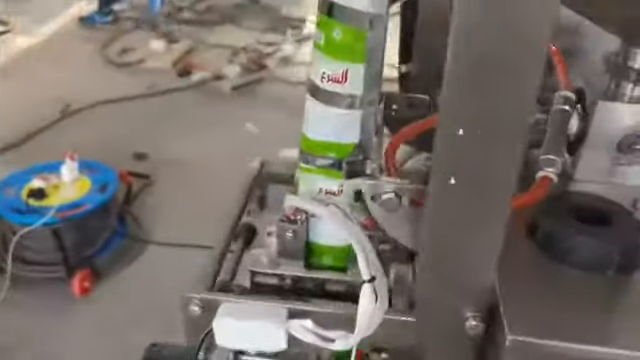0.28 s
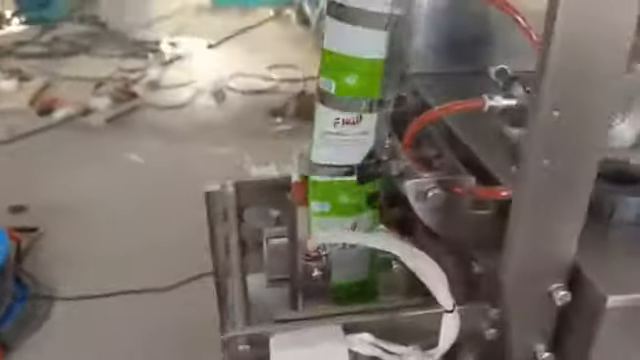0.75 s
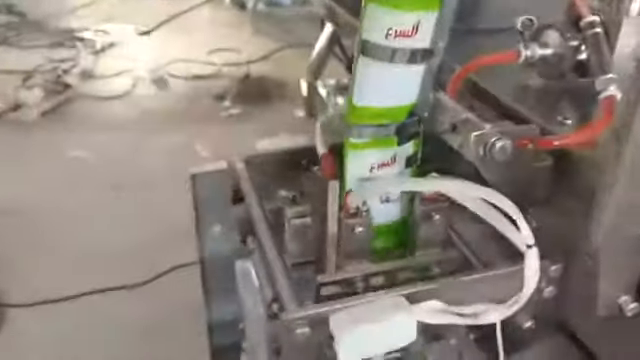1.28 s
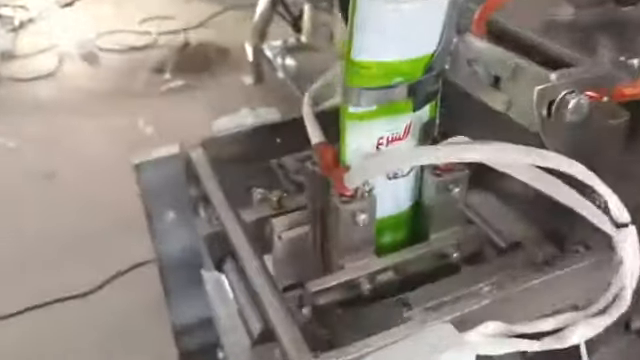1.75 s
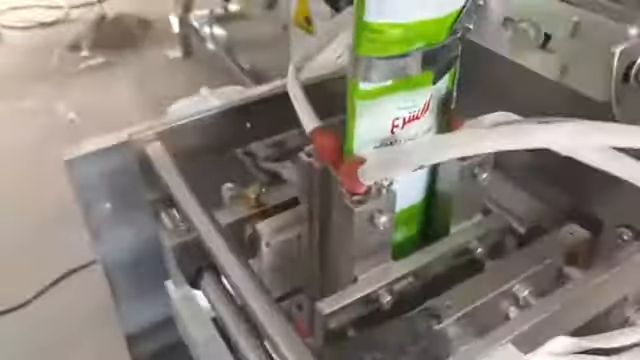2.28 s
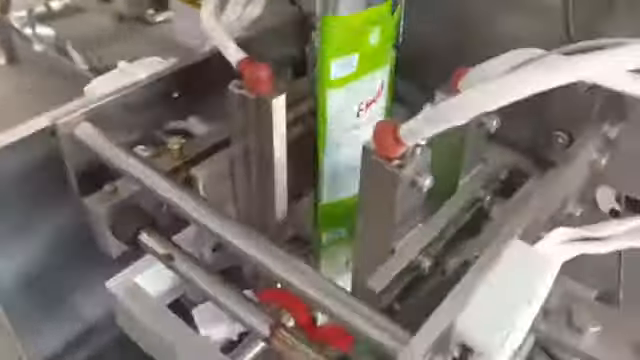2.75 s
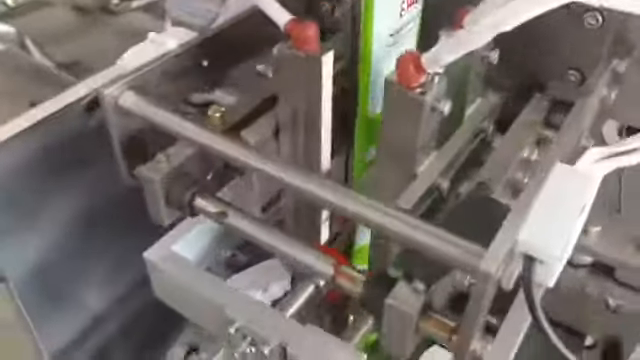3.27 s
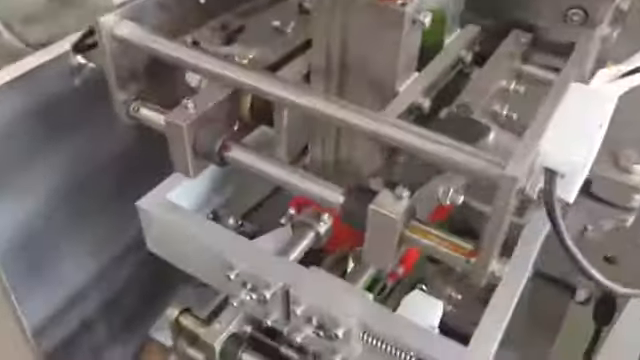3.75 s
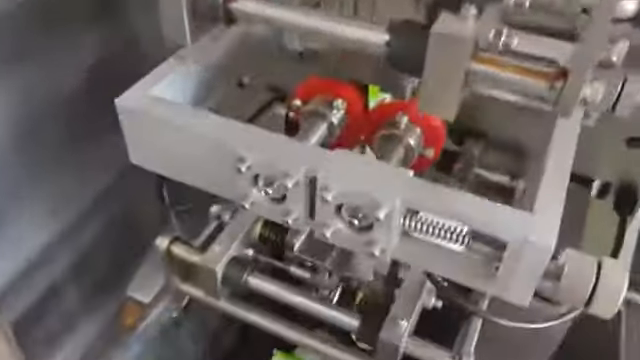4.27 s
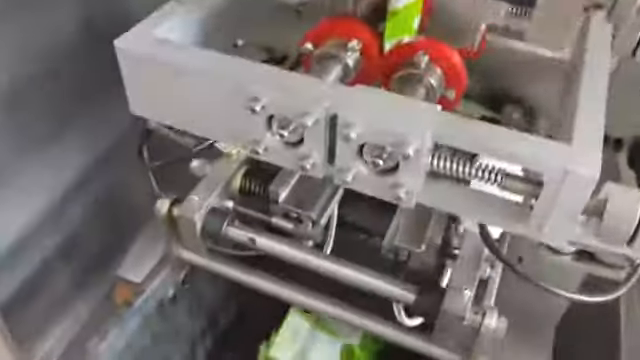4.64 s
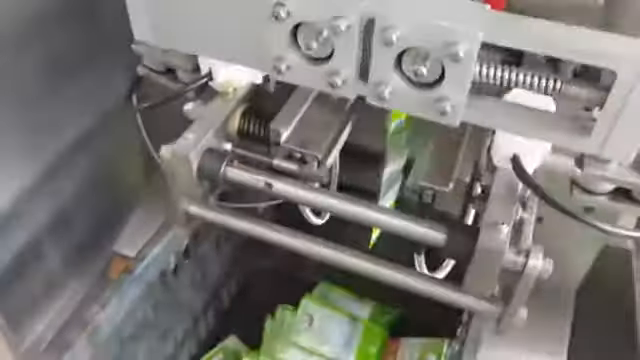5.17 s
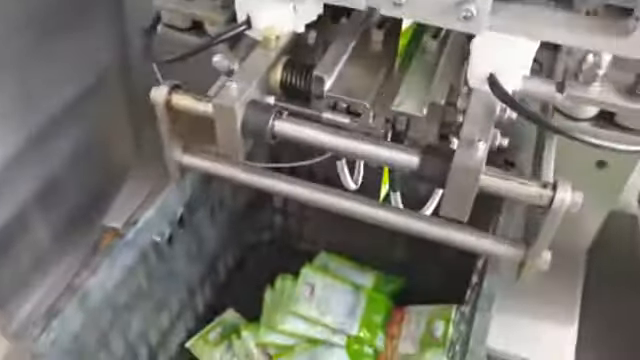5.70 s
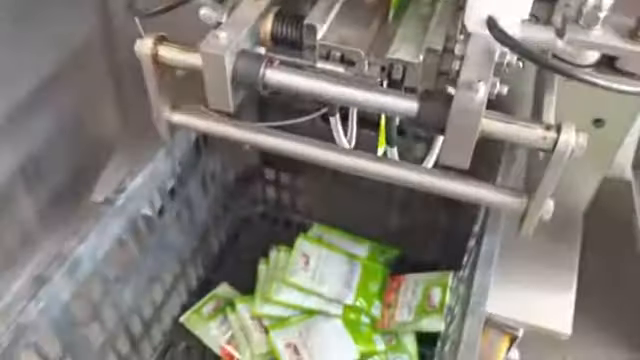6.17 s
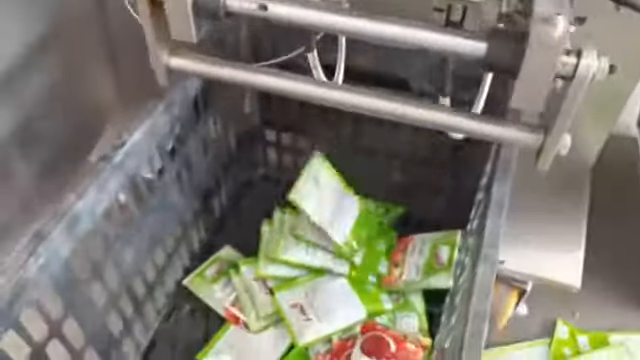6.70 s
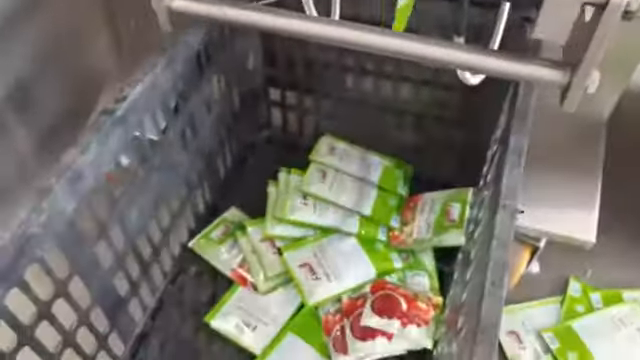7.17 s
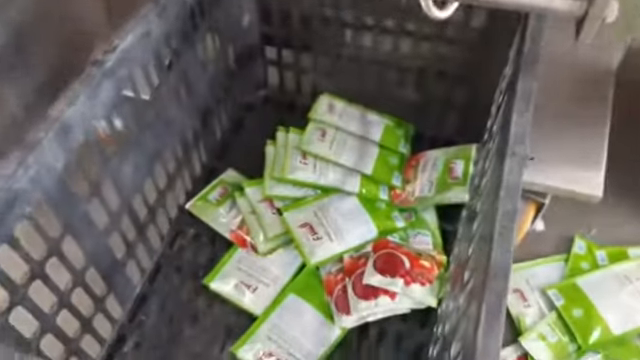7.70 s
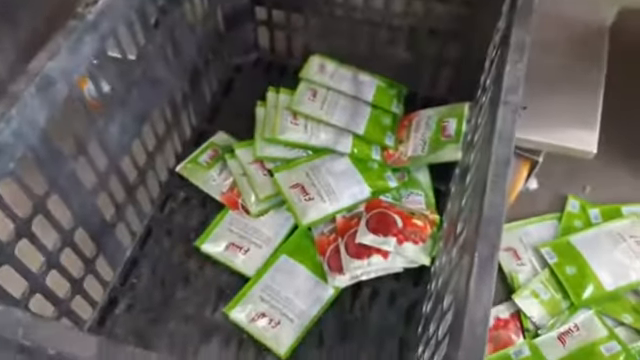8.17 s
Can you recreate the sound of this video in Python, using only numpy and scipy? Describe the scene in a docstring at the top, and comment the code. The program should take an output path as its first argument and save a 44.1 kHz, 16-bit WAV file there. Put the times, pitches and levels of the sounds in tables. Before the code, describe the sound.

Inside a busy factory hall, a packing machine gives off a constant, piercing air hiss over a wavering low hum and soft roar. Short scrapes recur at two-second intervals, with scattered dry clicks and knocks. Near the end the hiss weakens and dulls, bright foil snaps burst out as a packet lands, then thin metal rattles and rumble swells. Heard close on a moving hand-held stereo microphone, left-heavy, with the right side intermittently covered.

```python
"""A steady, sputtering high hiss comes first: compressed air escaping from a sachet packing machine.
Behind it lie the hum of the drive and the roar of a factory hall, all made from shaped noise and wavering tones.
Every two seconds the jaws scrape (gliding noise); the mechanism knocks and a loose panel chatters (struck modes).
Late on, a cut sachet crackles onto the pile in a crate (short bursts of bright noise).
A hand-held stereo microphone moves down along the machine, and the hand at times muffles its right port."""
import sys
import numpy as np
from scipy import signal
from scipy.fft import rfft, irfft, next_fast_len
from scipy.io import wavfile
from scipy.ndimage import uniform_filter1d, map_coordinates

SR = 44100
rng = np.random.default_rng(int(sys.argv[2]) if len(sys.argv) > 2 else 0)


def store_pcm(level_fs):
    """Save levels as 16-bit WAV."""
    pcm = np.round(np.clip(level_fs, -1, 1) * 32767).astype(np.int16)
    wavfile.write(sys.argv[1], SR, np.atleast_2d(pcm).T)


N = 371757
TIME = np.arange(N) / SR  # seconds


def gain_of(db):
    """Turns decibels into a factor for the amplitude."""
    return 10 ** (np.asarray(db) / 20)


def evened(x):
    """Scales a signal to an rms of 1."""
    return x / np.sqrt(np.mean(x ** 2) + 1e-20)


def curve_over_time(rows):
    """Joins rows of (seconds, value) by straight lines."""
    return np.interp(TIME, *np.transpose(rows))


def level(rows):
    """Turns rows of (seconds, dB) into a gain over time."""
    return gain_of(curve_over_time(rows))


def read(points, hz):
    """Reads rows of (Hz, value) on a log-frequency axis."""
    point_hz, value = np.transpose(points)
    return np.interp(np.log(hz + 1), np.log(point_hz + 1), value)


def coloured(x, colour):
    """Shapes the spectrum of x by rows of (Hz, dB), then sets its rms to 1."""
    size = next_fast_len(len(x))
    hz = np.fft.rfftfreq(size, 1 / SR)
    shaped = rfft(x, size) * gain_of(read(colour, hz))
    return evened(irfft(shaped, size)[:len(x)])


def drift(rate):
    """Random wandering of rms 1 that heads for a new value rate times a second."""
    values = rng.standard_normal(N // 8)
    return evened(map_coordinates(values, [TIME * rate], order=1, mode="wrap"))


def add(mix, s, sound):
    """Mixes a sound in, starting at s seconds."""
    part = mix[..., max(round(s * SR), 0):][..., :sound.shape[-1]]
    part += sound[..., :part.shape[-1]]


def ports(likeness):
    """White noise at two ports that are partly alike, by rows of (Hz, likeness 0 to 1)."""
    size = next_fast_len(N)
    first, other = rfft(rng.standard_normal((2, size)))
    same = np.clip(read(likeness, np.fft.rfftfreq(size, 1 / SR)), 0, 1)
    second = same * first + np.sqrt(1 - same ** 2) * other
    return irfft(np.array([first, second]), size)[:, :N]


def resonance(hz, width):
    """Noise of rms 1 in a resonance about width Hz wide, whose pitch follows the curve hz."""
    r = np.exp(-np.pi * abs(width) * np.sqrt(2) / SR)
    noise = rng.standard_normal(len(hz)) + 1j * rng.standard_normal(len(hz))
    smoothed = signal.lfilter([1 - r], [1, -r], noise)
    slow = signal.lfilter([1 - r], [1, -r], smoothed)
    # turning the slow noise round lifts it from 0 Hz to the wanted pitch
    return evened((slow * np.exp(2j * np.pi * np.cumsum(hz) / SR)).real)


def tones(rows):
    """Steady narrow resonances that waver in strength, from rows of (Hz, dB, width in Hz)."""
    return sum(gain_of(db) * resonance(np.full(N, hz), width) for hz, db, width in rows)


def wavering(hz, waver_hz, throb_db):
    """A tone of rms 1 that wanders a little in pitch and strength."""
    turns = np.cumsum(hz + waver_hz * drift(16)) / SR
    return evened(np.sin(2 * np.pi * turns) * gain_of(throb_db * drift(9)))


def mode(t, hz, t60):
    """One struck mode: a sine that fades by 60 dB in t60 seconds."""
    return np.sin(2 * np.pi * hz * t) * np.exp(-np.log(1000) * t / t60)


def burst(colour, t60, rise):
    """Coloured noise at two ports that rises fast and dies away, like a blow into many close modes."""
    t = np.arange(SR // 4) / SR
    noise = np.array([coloured(z, colour) for z in rng.standard_normal((2, len(t)))])
    return noise * (1 - np.exp(-t / rise)) * np.exp(-np.log(1000) * t / t60)


# The hand slips over the right port. Each row: start in seconds, end in seconds, basic loss in dB;
# each layer loses its own multiple of it.
COVERS = [(-.2, .58, 10), (0.916, 1.163, 3), (1.363, 2.65, 9), (2.902, 3.03, 7), (3.46, 3.75, 3.5)]
COVER_S, UNCOVER_S = 0.13, 0.09  # seconds the hand takes to close and to open


def covered():
    """Basic level change in dB at the right port as the hand closes over it and lets go."""
    loss = 0
    for start, end, db in COVERS:
        closing = (TIME - start) / COVER_S
        opening = (end - TIME) / UNCOVER_S
        loss = loss + db * np.clip(np.minimum(closing, opening) + .5, 0, 1)
    return -loss


def shaded(pair, share=0.94, open_db=0.33):
    """The hand weakens a layer at the right port; lower sounds are given a smaller share of the dB."""
    return pair * np.array([np.ones(N), gain_of(share * (open_db + covered()))])


# How the loss off axis spreads over pitch. Each row: frequency in Hz, share of the loss (below 0: opposite).
OFF_AXIS_SHARE = [(3000, 0.47), (5600, -0.47), (7000, -0.46), (8700, -0.27), (10300, 0.5), (15000, 1)]


def uneven(pair, ripple_db, patch_db, loss_db):
    """Random fine ripples and broad patches make a hiss uneven over time and pitch; off axis the top fades."""
    hz, t, z = signal.stft(pair, SR, nperseg=1024, noverlap=768)
    ripples, patches = rng.standard_normal((2,) + z.shape)
    # fine ripples: smooth over time, narrow in pitch, separate at each port
    ripples = uniform_filter1d(uniform_filter1d(ripples, size=9, axis=2), size=3, axis=2)
    ripples = gain_of(ripple_db * evened(uniform_filter1d(ripples, size=2, axis=1)))
    ripples /= np.sqrt(uniform_filter1d(ripples ** 2, size=24, axis=1))  # evened out across pitch
    # broad patches: shared by both ports
    patches = uniform_filter1d(uniform_filter1d(patches[0], size=12, axis=1), size=9, axis=0)
    patches = evened(gain_of(patch_db * evened(patches)))
    loss = read(OFF_AXIS_SHARE, hz)[:, None] * np.interp(t, TIME, loss_db)
    heard = z * ripples * patches * gain_of(-loss)
    return signal.istft(heard, SR, nperseg=1024, noverlap=768)[1][:, :N]


# How alike the hall sounds at both ports. Each row: frequency in Hz, likeness from 0 to 1.
LIKENESS = [(30, .75), (80, 0.98), (170, 0.86), (350, 0.78), (700, 0.25), (1300, 0), (4000, 0.25)]


def diffuse(colour):
    """Noise from all round: most alike at both ports in the bass, far less in the treble."""
    return np.array([coloured(z, colour) for z in ports(LIKENESS)])


# Levels of the hall's rumble (growing near the floor), roar and diffuse hiss.
# Each row: time in seconds, relative level in dB.
RUMBLE = [(0, -44), (.9, -45), (1.28, -48), (1.65, -43), (2.2, -46.5), (2.4, -47), (2.7, -46), (3.1, -49.5),
          (3.5, -45), (4.1, -46.5), (4.8, -46.7), (5.6, -44.5), (6.7, -45.5), (7.55, -42), (7.95, -38.5),
          (8.3, -42.5), (8.43, -47)]
ROAR = [(0, -48.5), (.24, -45.5), (.6, -50.5), (1.15, -51.5), (1.5, -49), (2.22, -49), (2.32, -53),
        (2.75, -51.5), (2.93, -54), (3.3, -50.5), (3.7, -51.5), (4.27, -49), (4.5, -52), (5.3, -49.5),
        (6.25, -48), (6.8, -47), (7.2, -49.7), (7.55, -46), (8.43, -41)]
WASH = [(0, -44.5), (1.2, -41.5), (2.2, -44), (2.35, -44.5), (2.8, -42), (3.65, -47), (4.15, -45.5),
        (4.6, -44), (6.3, -42), (7.05, -42.5), (7.35, -44.5), (8.43, -44.5)]
# Their colours. Each row: frequency in Hz, relative strength in dB.
RUMBLE_COLOUR = [(20, -35), (50, -23), (64, -19), (76, -3.5), (100, .5), (130, -1), (160, -1.5),
                 (200, -1.5), (260, -6), (400, -22.5), (900, -60)]
ROAR_COLOUR = [(100, -30), (200, -9.5), (260, 1.2), (330, -1.3), (450, -2), (600, -5.5), (700, -5.5),
               (820, -8), (1000, -9.5), (1250, -18), (1800, -24.5), (5000, -48)]
WASH_COLOUR = [(300, -15), (900, -7), (1500, -4), (2100, 1), (2700, -0.5), (4000, -2.2), (6000, -1.5),
               (10000, -32), (15500, -37)]


def hall(rumble_db=-1.6, roar_db=0.0, flutter_db=1.63, surge_db=1.46, sway_db=0.15,
         ripple_db=4.5, patch_db=1.5, wash_db=-1.28, lump_db=1.5):
    """Rumble, surging roar and diffuse hiss of the machinery; the hiss flutters randomly in level."""
    lumps = evened(gain_of(lump_db * drift(18)))
    rumble = diffuse(RUMBLE_COLOUR) * level(RUMBLE) * gain_of(rumble_db) * lumps
    roar = diffuse(ROAR_COLOUR) * level(ROAR) * gain_of(roar_db + surge_db * drift(14))
    flutter = evened(gain_of(flutter_db * drift(60) + sway_db * drift(16)))
    wash = diffuse(WASH_COLOUR) * level(WASH) * gain_of(wash_db) * flutter
    wash = uneven(wash, ripple_db, patch_db, np.zeros(N))
    return rumble + shaded(roar, share=.3) + shaded(wash)


# Colour of the hiss's grain. Each row: frequency in Hz, relative strength in dB.
GRAIN_COLOUR = [(300, -21), (1300, -5), (2300, 1), (5500, -2), (10000, -16), (15500, -35)]


def grain(rate=260, spread_db=3.5, grain_db=-8.5):
    """Tiny random ticks, about rate a second, give the hiss a grainy texture."""
    sizes = gain_of(spread_db * np.minimum(rng.exponential(1, N), 3))
    ticks = sizes * (rng.random(N) < rate / SR) * rng.choice([-1., 1.], N)
    tick_sound = burst(GRAIN_COLOUR, t60=0.0074, rise=.0001)
    pair = signal.oaconvolve(ticks[None], tick_sound, axes=1)[:, :N]
    return shaded(evened(pair) * level(WASH) * gain_of(grain_db))  # swells with the hiss


# Hum of the drive, then thin whines of the electrics.
# Each row: frequency in Hz, relative level in dB, approximate width in Hz.
HUM = [(138.9, -55.5, 5), (690, -65.5, 35), (985, -75, 23)]
WHINES = [(2085, -68, 22), (11900, -68, 20), (14430, -74, 10), (14950, -75, 10)]
# The gear's tone as the microphone comes down to it. Each row: time in seconds, relative level in dB.
GEAR = [(0, -7), (3.4, -7), (4.0, -2), (5.5, -4.5), (6.7, 0.5), (8.43, -2)]


def drive(motor_hz=183.8, motor_db=-52.0, waver_hz=1.7, throb_db=2.5, follow=0.52,
          gear_hz=375.3, gear_db=-60, gear_waver_hz=1.4):
    """Motor tone and hum swell with the rumble; a gear sings low in the machine; the hand can hide the whines."""
    motor = gain_of(motor_db) * wavering(motor_hz, waver_hz, throb_db)
    swell = evened(level(RUMBLE) ** follow)
    gear = gain_of(gear_db) * wavering(gear_hz, gear_waver_hz, throb_db) * level(GEAR)
    whines = np.array([tones(WHINES), tones(WHINES)])
    return (motor + tones(HUM)) * swell + gear + shaded(whines)


# Low throbs, mostly of the motor, and a finger bump at the right port (0.51 s).
# Each row: time of the peak in seconds, level in dB, pitch in Hz, length in seconds, left minus right in dB.
THROBS = [(.16, -40.5, 186.4, .14, 0), (.51, -38, 138.3, 0.091, -18), (1.04, -44.5, 170, .09, 0),
          (1.18, -41.5, 185, 0.11, 0), (1.63, -41.5, 180, .14, 2), (1.91, -41, 208, 0.074, 4),
          (2.06, -48, 258.4, .2, 0), (2.59, -44, 185.5, .09, 0), (3.699, -41.5, 183.7, 0.2, 2),
          (5.41, -45, 180, .1, 0), (7.07, -41, 195.5, .12, -2), (7.46, -40.5, 185.4, .12, -2),
          (7.655, -42, 186, .08, 0), (7.9, -43.5, 261.5, .1, 0), (7.96, -35, 109, 0.11, -1),
          (8.265, -38, 172, .07, 0)]


def throbs():
    """Low throbs, mostly of the motor, and a finger bump at the right port; each swells and dies."""
    out = np.zeros((2, N))
    for s, db, hz, length, pan_db in THROBS:
        t = np.arange(int(length * SR)) / SR
        sides = gain_of([[db + pan_db / 2], [db - pan_db / 2]])
        throb = np.sqrt(2) * np.hanning(len(t)) * np.sin(2 * np.pi * hz * t)
        add(out, s - length / 2, sides * throb)
    return out


# Knocks and clicks of the mechanism. Each row: start in seconds, relative level in dB, pitch in Hz,
# seconds to fade by 60 dB.
KNOCKS = [(.858, -32.5, 2700, .06), (2.683, -45, 1210, .16), (2.705, -46, 720, .12),
          (3.782, -39, 2540, .06), (4.342, -44, 1300, .08), (4.707, -37, 1600, .06),
          (5.518, -38, 1040, .06), (6.371, -38.5, 1250, 0.062), (6.592, -33, 3400, .07),
          (6.606, -39, 2100, 0.071), (6.735, -37, 3750, .04), (6.883, -38, 3840, .04),
          (6.982, -40, 2590, .04), (7.16, -39, 4800, .05), (7.549, -38, 1300, .07), (7.846, -40, 2210, .07),
          (8.333, -39.5, 1990, .05), (8.392, -35.5, 1105, 0.12), (8.401, -36.5, 1410, .12)]
# Colour of a knock. Each row: multiple of its pitch, relative strength in dB.
KNOCK_COLOUR = [(.1, -16), (.6, -7), (1, 0), (1.5, -9.5), (3.5, -13), (12, -36)]


def knocks(ring=0.37):
    """Jaws and levers meet their stops: a short crack, and a ring at the pitch of the part."""
    out = np.zeros((2, N))
    t = np.arange(SR // 4) / SR
    for s, db, hz, t60 in KNOCKS:
        colour = [(multiple * hz, colour_db) for multiple, colour_db in KNOCK_COLOUR]
        crack = burst(colour, t60, rise=0.00069)
        add(out, s, gain_of(db) * (crack + ring * mode(t, hz, t60)))
    return shaded(out, share=.5)


# Modes of the loose panel. Each row: pitch in Hz, relative level in dB, seconds to fade by 60 dB.
PANEL_MODES = [(600, -6, 0.033), (760, -12, .025), (930, -4, 0.045), (986, 0, 0.051), (1050, -6, .035),
               (1200, -7, .025), (1410, -10, .025), (2090, -15, .05)]
# Its rattle over time. Each row: time in seconds, level in dB.
CHATTER = [(6.9, -75), (6.97, -53), (7.25, -58), (7.37, -51), (7.45, -45), (7.57, -44), (7.63, -47),
           (7.71, -47), (7.8, -52), (8.03, -51), (8.12, -58), (8.43, -58.5)]
# Its hard clunks. Each row: start in seconds, relative level in dB.
CLUNKS = [(7.42, -45), (7.455, -42), (7.549, -40), (7.695, -44)]


def panel(catch_db=3.0, apart=1.0):
    """A loose steel panel chatters in its modes: a few hard clunks in a fine rattle that lingers."""
    t = np.arange(SR // 4) / SR
    ring = sum(gain_of(db) * mode(t, hz, t60) for hz, db, t60 in PANEL_MODES)
    contacts = rng.standard_normal((2, N)) * gain_of(catch_db * drift(80))
    common, side = signal.oaconvolve(contacts, ring[None], axes=1)[:, :N]
    out = evened(common + apart * np.array([[1], [-1]]) * side) * level(CHATTER)
    for s, db in CLUNKS:
        add(out, s, gain_of(db) * ring)
    return out


def rubbed(hz, share, apart=0.7):
    """Friction noise at two ports, in a resonance whose width is a share of its mean pitch."""
    width = share * hz.mean()
    common, side = resonance(hz, width), resonance(hz, width)
    return evened(common + apart * np.array([[1], [-1]]) * side)


# Strokes of the jaws, about two seconds apart. Each row: end in seconds, then the relative levels in dB
# of the scrape, the rasp and the rumble.
STROKES = [(.31, -46, -58, -46), (2.27, -50.5, -62, -50), (4.345, -52.5, -54, -50),
           (6.385, -48.5, -56, -49), (8.41, -45, -52, -43)]
STROKE_S, STROKE_START_HZ, STROKE_END_HZ = .3, 320, 780  # length in seconds, rise of the scrape in Hz
RUB_WIDTH = 0.45  # width of the scrape as a share of its mean pitch
ROLL_HZ, ROLL_WIDTH = 225.3, 0.49  # the carriage's rumble: pitch in Hz, width as a share of it
RASP_HZ, RASP_WIDTH = 981, 0.39  # the rasp: pitch in Hz, width as a share of it


def strokes(catch_db=1.5, swell_db=5):
    """Jaws slide along their guides: a scrape that rises with their speed, with a low rumble and thin rasp."""
    out = np.zeros((2, N))
    progress = np.linspace(0, 1, int(STROKE_S * SR))
    hz = STROKE_START_HZ + (STROKE_END_HZ - STROKE_START_HZ) * progress ** 2
    swell = evened(gain_of(swell_db * progress))
    fade = signal.windows.tukey(len(hz), .4)
    for end, db, rasp_db, roll_db in STROKES:
        scrape = gain_of(db) * swell * rubbed(hz, RUB_WIDTH)
        rasp = gain_of(rasp_db) * rubbed(np.full(len(hz), RASP_HZ), RASP_WIDTH)
        roll = gain_of(roll_db) * rubbed(np.full(len(hz), ROLL_HZ), ROLL_WIDTH, apart=0.28)
        add(out, end - STROKE_S, (scrape + rasp + roll) * fade)
    catching = evened(gain_of(catch_db * drift(70)))
    return shaded(out * catching, share=0.39)


# The loudest snaps as a sachet lands. Each row: start in seconds, relative level in dB.
FOIL = [(6.762, -17), (6.902, -15), (6.9455, -15), (6.9495, -12.5), (6.9612, -14), (6.9655, -18),
        (6.9688, -15), (6.976, -17), (6.984, -15), (6.9942, -16), (7.0245, -17), (7.026, -11), (7.05, -20),
        (7.0885, -17), (7.157, -15)]
# Colour of the snaps at each port. Each row: frequency in Hz, relative strength in dB.
FOIL_LEFT_COLOUR = [(1500, -19), (4800, -17), (6000, -8), (7300, -9), (8800, 12.5), (10000, -4),
                    (12000, -24), (15500, -28)]
FOIL_RIGHT_COLOUR = [(1500, -14), (4800, -10), (5800, 3), (8800, 3), (10500, -12), (15500, -17)]
# The smaller crackle while it settles: start and length in seconds, first relative level in dB,
# fade in dB per second, snaps per second.
SETTLE_S, SETTLE_LENGTH_S, SETTLE_DB, SETTLE_FADE_DB_PER_S, SETTLE_RATE = 6.93, .26, -24.5, 22, 220


def foil(ring_t60=0.0083, left_db=3.5, right_db=-3.0, spread_db=7.0):
    """Stiff foil buckles in short bright snaps, amid a smaller crackle that grows ever softer."""
    out = np.zeros((2, N))
    crackle = []
    for delay in np.arange(0, SETTLE_LENGTH_S, 1 / SETTLE_RATE):
        late, size = rng.uniform(-1, 1, 2)
        s = SETTLE_S + delay + .5 * late / SETTLE_RATE
        crackle.append((s, SETTLE_DB - SETTLE_FADE_DB_PER_S * delay + spread_db * size))
    for s, db in FOIL + crackle:
        left = burst(FOIL_LEFT_COLOUR, ring_t60, rise=0.00016)[0]
        right = burst(FOIL_RIGHT_COLOUR, ring_t60, rise=0.00016)[0]
        add(out, s, gain_of(db) * np.array([left, right]))
    return out * gain_of([[left_db], [right_db]])


# The jet as the microphone moves through its beam and finally below it.
# Each row: time in seconds, relative level in dB.
JET = [(0, -19), (.56, -19), (.66, -15.5), (.9, -19), (1.64, -20), (1.8, -17.5), (2.38, -17), (2.56, -19.5),
       (2.8, -20.5), (2.93, -16), (3.14, -19.5), (3.72, -19.5), (3.98, -17.5), (4.36, -21), (5.1, -21),
       (5.5, -19.5), (5.85, -20), (6.39, -17), (6.58, -24.5), (6.7, -26.5), (7.15, -27.5), (7.25, -32.8),
       (7.42, -30.5), (7.53, -28), (7.72, -32), (8.43, -27.5)]
# The beam turns against the microphone. Each row: time in seconds, relative level at the right port in dB.
JET_PAN = [(0, -13), (.7, -10), (1.26, -12.5), (2.0, -5), (2.78, -16.5), (3.24, -11), (3.75, -19),
           (4.12, -8.5), (4.6, -15.5), (4.8, -12), (5.85, -14), (6.55, -7.5), (8.43, -9.5)]
# Past the jet it sounds duller. Each row: time in seconds, loss at the very top in dB (below 0: a gain).
OFF_AXIS = [(0, -2), (6.35, 1), (6.6, 7.5), (7.2, 4.5), (8.43, 1.5)]
# Colour of the jet at each port. Each row: frequency in Hz, relative strength in dB.
JET_LEFT_COLOUR = [(1200, -47), (3000, -29.5), (4500, -23), (5300, -17.5), (6200, -11), (7000, -11.5),
                   (7800, -5.5), (8500, 0.74), (9100, -0.3), (9500, -2.5), (10200, -6.5), (11000, -12.5),
                   (11700, -26.5), (12300, -23), (13400, -24), (14500, -35), (15300, -53)]
JET_RIGHT_COLOUR = [(1200, -40), (3000, -12), (4600, -6), (5500, 1), (6200, 4), (7400, -1.5), (8200, 2),
                    (9000, -2), (10000, -6), (11700, -13.5), (13200, -7), (15600, -16)]
# How alike the jet sounds at both ports. Each row: frequency in Hz, likeness from 0 to 1.
JET_LIKENESS = [(3000, 0), (6000, 0.38), (8000, 0.05), (10500, 0), (13000, 0.6)]
JET_SHADOW = 2.54  # the jet, being higher and more direct, loses this many times the hand's basic dB


def air_jet(sputter_db=0.55, flutter_db=0.5, sway_db=0.35, ripple_db=4.0, patch_db=0.3,
            left_db=0., right_db=1.5, leak_db=-26):
    """Turbulent air breaks up in millisecond spurts and sways; a little of the left port leaks to the right."""
    spurts = gain_of(sputter_db * drift(900) + flutter_db * drift(70) + sway_db * drift(10))
    at_left, at_right = spurts * ports(JET_LIKENESS)
    left = coloured(at_left, JET_LEFT_COLOUR) * gain_of(left_db)
    right = coloured(at_right, JET_RIGHT_COLOUR) * level(JET_PAN)
    right = right * gain_of(right_db + JET_SHADOW * covered())
    pair = np.array([left, right + gain_of(leak_db) * left]) * level(JET)
    return uneven(pair, ripple_db, patch_db, curve_over_time(OFF_AXIS))


def scene():
    """Everything at the two ports, from the background to the jet."""
    background = hall() + grain() + drive() + throbs()
    machine = knocks() + panel() + strokes()
    return background + machine + foil() + air_jet()


EDGE_HZ = 15750


def record(dry):
    """The recorder's band limit: a steep filter removes what lies above EDGE_HZ."""
    low_pass = signal.firwin(1601, EDGE_HZ, window=("kaiser", 9), fs=SR)
    return signal.oaconvolve(dry, low_pass[None], "same")


dry = scene()
out = record(dry)
store_pcm(out)
```